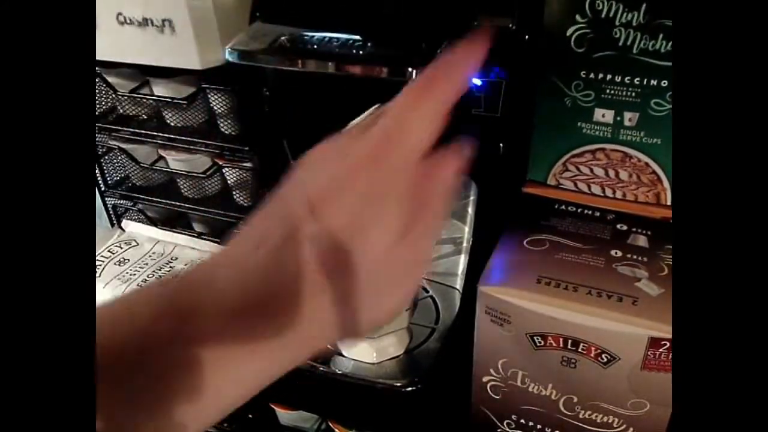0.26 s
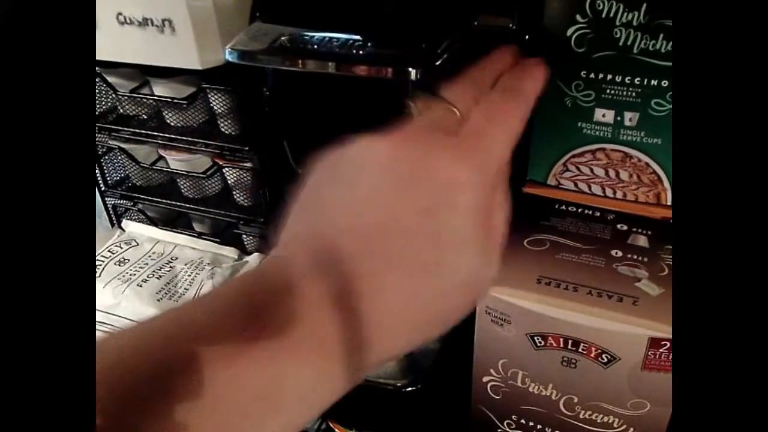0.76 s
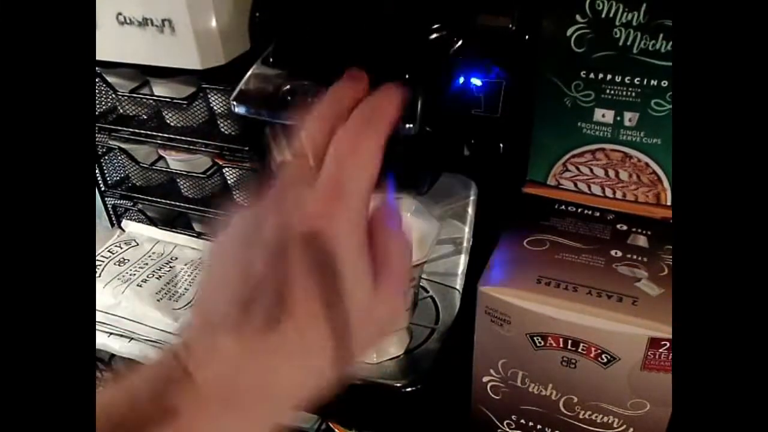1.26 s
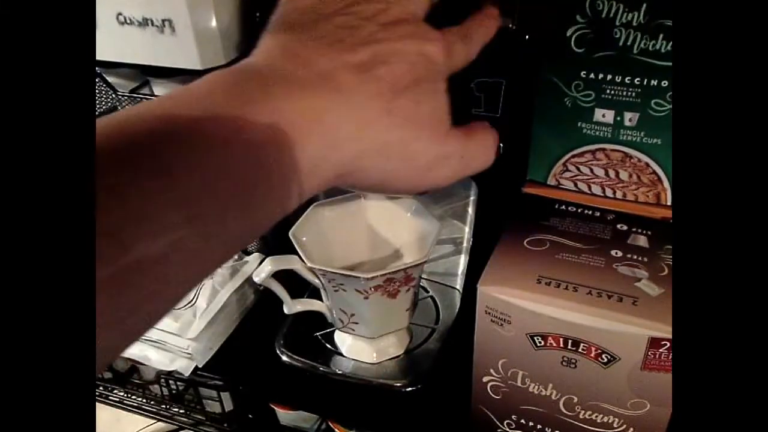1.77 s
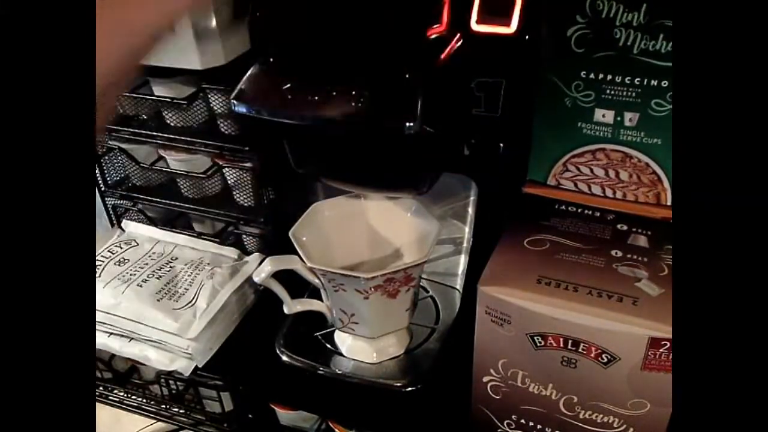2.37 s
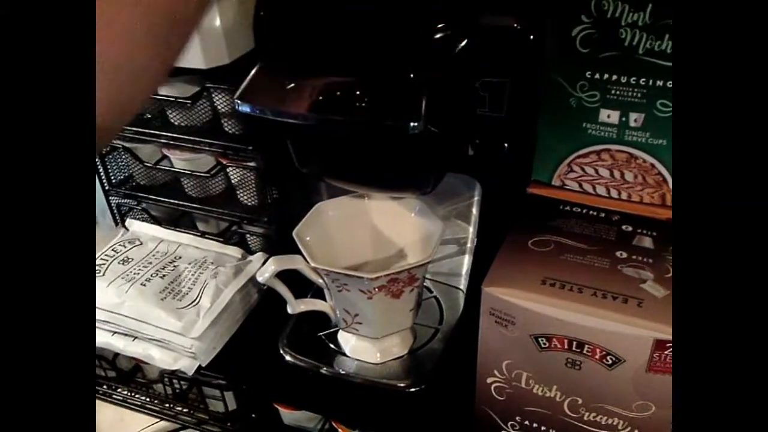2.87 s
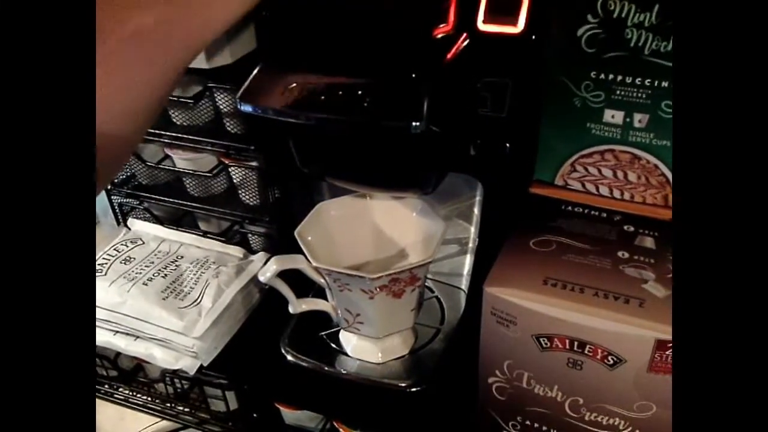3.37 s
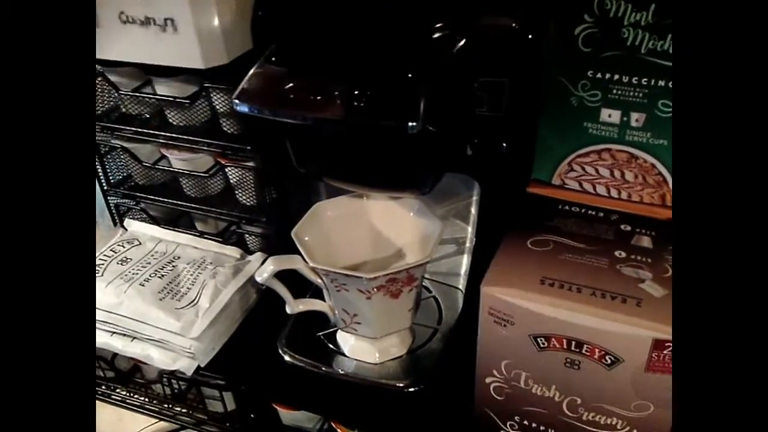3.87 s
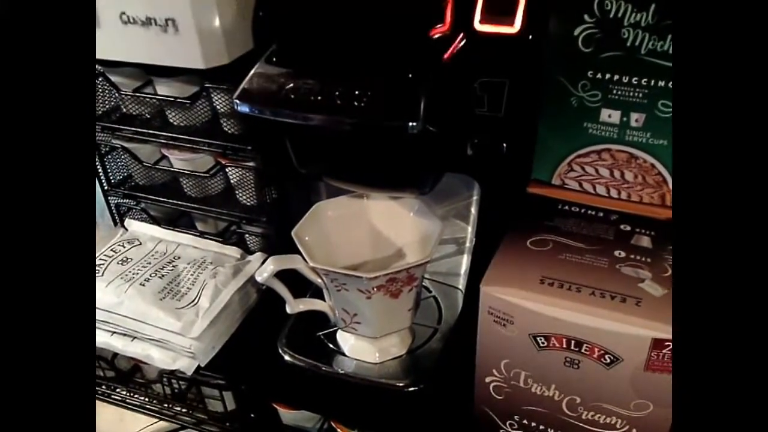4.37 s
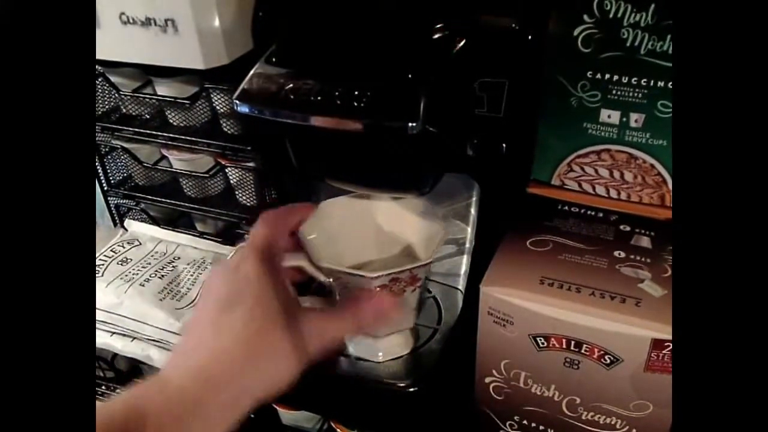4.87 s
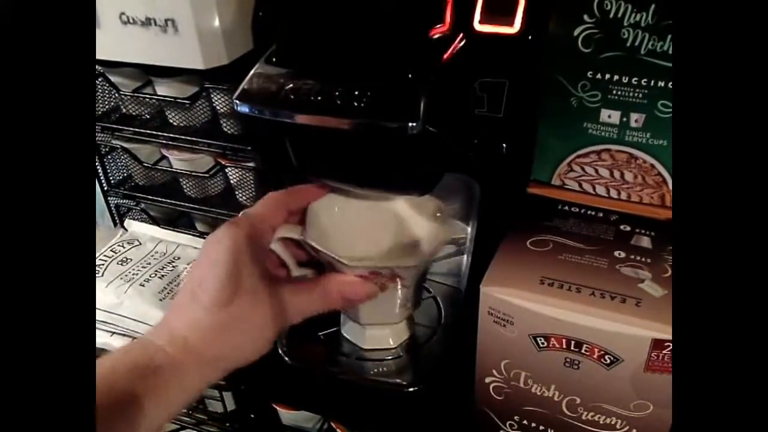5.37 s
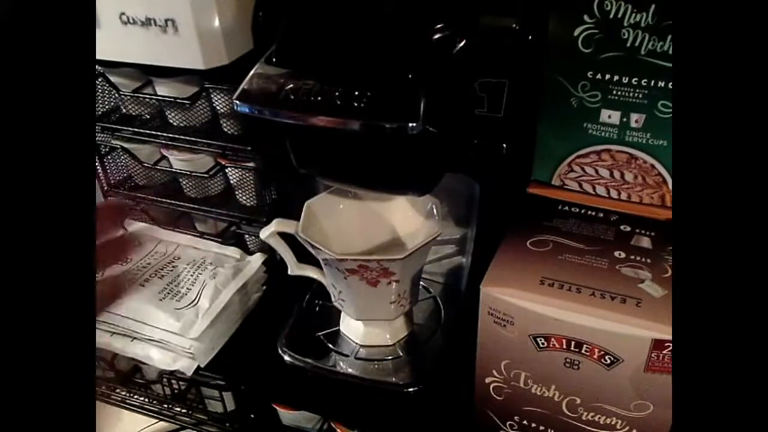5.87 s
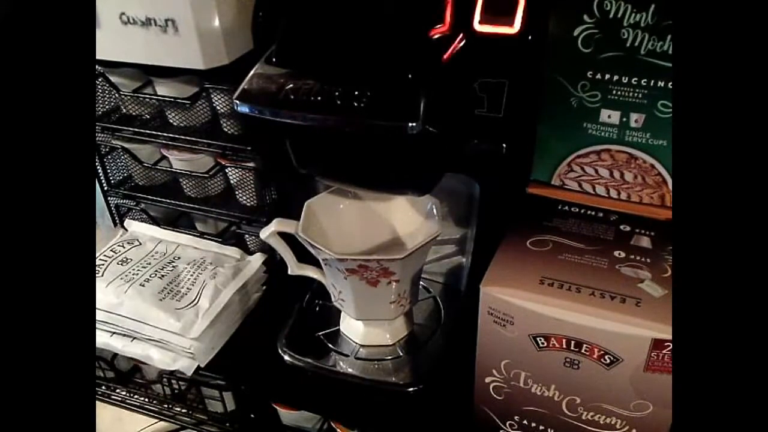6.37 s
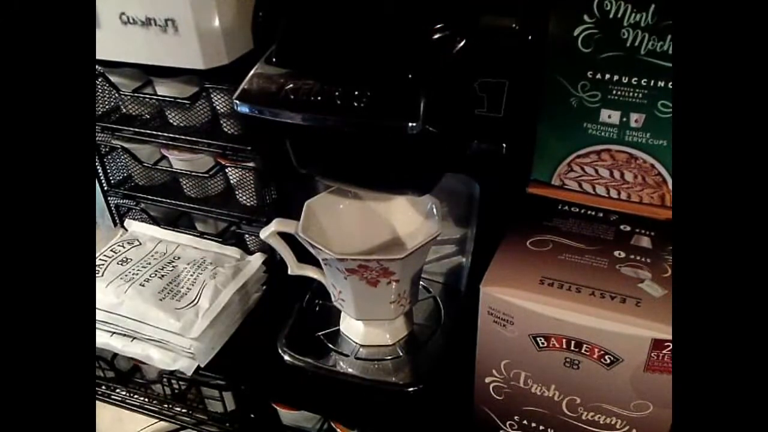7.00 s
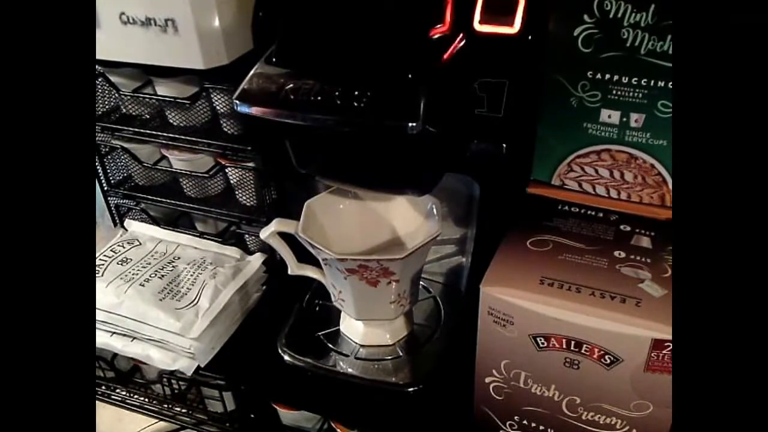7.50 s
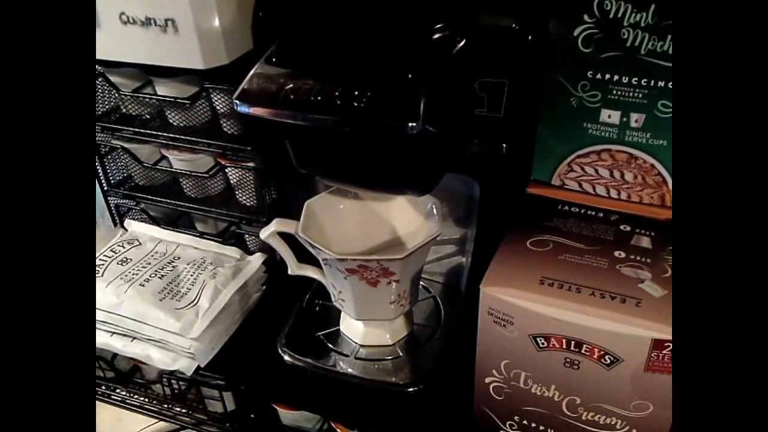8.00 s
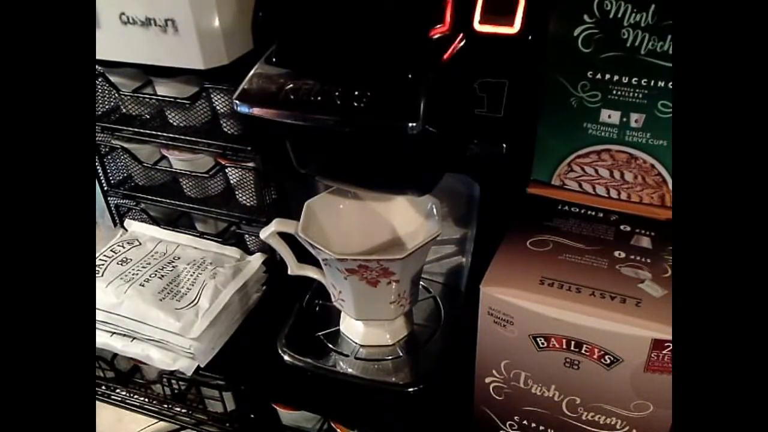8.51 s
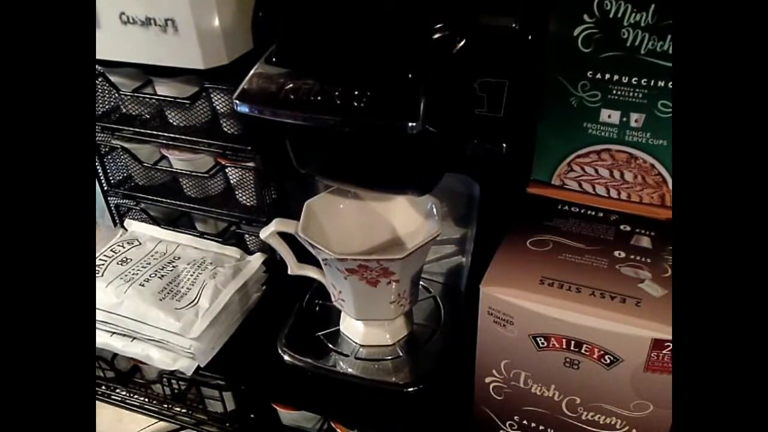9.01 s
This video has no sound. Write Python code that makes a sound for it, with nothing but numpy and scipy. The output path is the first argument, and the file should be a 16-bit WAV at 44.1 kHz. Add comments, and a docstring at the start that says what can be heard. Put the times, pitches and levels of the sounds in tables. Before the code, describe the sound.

In a quiet kitchen, a coffee machine is snapped shut with sharp clicks, a cup shifts on its tray, and heating water begins faintly.

```python
"""A coffee brewer on a kitchen counter, close to a phone: a hand shuts its pod drawer, presses buttons, works and slams
the lid, then shifts a china cup on the drip tray. Something thuds on the counter and the boiler starts a faint rush.
Blows excite decaying modes and noisy clatter; rubbing and dragging are shaped noise; panel flexing and a hinge
squeak are sines; the boiler is noise through resonances. A quiet room tone and low rumble, both coloured noise,
lie under it all."""
import sys
import numpy as np
from scipy import signal
from scipy.fft import rfft, irfft
from scipy.io import wavfile
from scipy.ndimage import uniform_filter1d

SR = 44100
rng = np.random.default_rng(int(sys.argv[2]) if len(sys.argv) > 2 else 0)


def unload_audio(sound):
    """Save the sound as a 16-bit wav file, at the path given as the first command line argument."""
    columns = np.transpose(np.atleast_2d(sound))
    # keep every value between -1 and 1, then stretch to whole-number steps
    steps = np.round(np.clip(columns, -1, 1) * 32767)
    wavfile.write(sys.argv[1], SR, steps.astype(np.int16))


N = 407925
TIME = np.arange(N) / SR

# Room tone spectrum: (frequency [Hz], relative level per Hz [dB])
ROOM_SPECTRUM = [(53, -21.5), (90, -1), (183, -9), (250, -10.5), (382, -3), (520, -11.5), (700, -7),
                 (1000, -11.5), (1350, -14), (1800, -22), (2600, -19), (3840, -25.5), (11500, -31.5),
                 (15600, -35)]
# Low rumble spectrum: (frequency [Hz], relative level per Hz [dB])
RUMBLE_SPECTRUM = [(2.4, -34), (4.0, 3), (22, -1), (29, -5), (54, -11.5), (131, -29), (156, -24.5),
                   (184, -30), (200, -26.5), (260, -66), (440, -120)]
# Mean rumble level, about which it wanders: (time [s], level [dB])
RUMBLE_LEVEL = [(0, -56), (1.4, -52.5), (2.5, -59.5), (2.95, -55.5), (3.7, -49.5), (4.3, -55.5),
                (6.3, -55.5), (9.25, -56)]
# Strokes of a hand over plastic: (peak time [s], rise [s], fall [s], level [dB],
#     low share [dB], bright share [dB])
RUB_STROKES = [(.52, 0.24, 0.05, -67, -9, -14), (1.08, 0.12, 0.9, -72.5, 10, -26),
               (2.2, 0.16, 0.2, -61, -27, -26), (2.9, 0.068, 0.13, -66, 11.5, -5.5),
               (3.12, 0.21, 0.083, -70, 11, -12), (3.35, 0.1, 0.12, -71, 13.5, 1),
               (3.6, 0.23, 0.32, -64.5, -0.5, -8), (4.11, 0.074, .1, -69.5, -13.5, -1.5),
               (4.87, .13, 0.087, -63, -21, -2), (5.23, 0.036, 0.046, -56.5, -3, -3.5),
               (5.47, .12, 0.33, -65, 0.5, -11), (7.76, 0.16, 0.3, -62.5, -8, -10)]
# Rubbing felt through the counter: (frequency [Hz], relative level per Hz [dB])
RUB_LOW_SPECTRUM = [(30, -34), (70, 7.5), (130, -4.5), (250, -7), (500, -27), (16000, -120)]
# Loose plastic after a blow, before tilting: (frequency [Hz], relative level per Hz [dB])
CLATTER_SPECTRUM = [(35, -58.5), (70, -27), (226, -20), (480, -2.5), (700, -7.5), (1000, -4), (1300, -11.5),
                    (1650, -20.5), (2100, -20.5), (2700, -19), (3500, -29), (5000, -36), (10000, -53.5),
                    (13000, -57), (16000, -75)]

# Blows on each part; the struck spot favours the modes near one pitch. All six tables:
#     (time [s], nominal level [dB], spectral tilt [dB/octave], favoured frequency [Hz],
#     clatter relative to ring [dB], contact time constant [s])
DRAWER_BLOWS = [(.994, -44, 0, 650, -9, 0.0046), (1.034, -43.5, -1.5, 1100, -6, .0015),
                (1.074, -46, 5, 1150, 2, .007), (1.091, -32.5, 3, 4000, 5.5, 0.0029),
                (1.095, -22, -0.5, 800, -5.5, 0.0029), (1.32, -50.5, -6, 700, -9, 0.00088),
                (1.498, -57, -3, 750, -8, 0.00098)]
BUTTON_BLOWS = [(1.829, -35.5, 0.5, 1140, -16.5, 0.0012), (1.843, -43, -11, 1200, -17, 0.0014),
                (1.958, -34, 0.5, 1260, -10, 0.0018), (2.156, -56, 6.5, 4700, -5, 0.0011),
                (2.176, -52, 0, 2820, 6.5, 0.002)]
LID_BLOWS = [(2.924, -49.5, -0.5, 2800, -22, .0015), (3.048, -54, 7, 2450, -7, .002),
             (3.055, -40.5, -.5, 1050, -13, 0.00089), (3.092, -49.5, 2, 2700, 0, 0.0018),
             (3.295, -46, 0, 1190, -1.5, 0.0017), (3.312, -42.5, -1.5, 2500, 0, .0021),
             (3.379, -50.5, 0, 1000, -3, 0.0032), (3.493, -39, -1, 880, -3, 0.0016),
             (3.512, -48, -3.5, 810, 10, 0.0032), (3.701, -42, -2.5, 750, -13, 0.0031),
             (3.729, -33.5, 3, 599, 6, 0.00082), (3.7323, -14.5, 1.5, 510, -7.5, .0004),
             (3.734, -18.5, 2.5, 996, -1.5, .0004)]
CUP_BLOWS = [(4.788, -38, 1.5, 7800, -36, 0.00098), (4.851, -67, -5, 4400, 4, .0005),
             (4.904, -57.5, -8, 12500, 8, .0005), (4.999, -50, -4.5, 6450, -14, .0003),
             (5.203, -65, 6, 10500, 7, .001), (5.227, -57, -1, 5950, -6, .001),
             (5.651, -62, -6, 4430, -12, 0.0013), (5.653, -64.5, 0, 6100, -14, .001)]
TRAY_BLOWS = [(4.791, -45, -1, 600, 3, 0.0021), (4.848, -46, 5, 1100, -14, .0032),
              (4.884, -51, 3.5, 2700, -1, .0033), (4.92, -41, 1, 696, 3.5, 0.0058),
              (4.998, -48, 3.5, 1010, -8, 0.0017), (5.183, -44.5, -0.5, 714, -4, .001),
              (5.204, -39.5, 4, 800, -10, 0.0058), (5.228, -54, 6, 2500, 4, .002),
              (5.256, -41, 0.5, 790, 1, 0.0024), (5.391, -32, 3, 950, -14, 0.0029),
              (5.417, -35.5, -8, 456, -.5, .0037), (5.468, -47.5, 1.5, 995, 4, 0.0064)]
COUNTER_BLOWS = [(7.554, -19, 1, 857, -7.5, 0.0032), (7.888, -41.5, -5.5, 610, -1, 0.0023),
                 (8.541, -51.5, 5, 1600, -2.5, 0.001)]

# Modes each part rings with; blows() scales the decay. All six tables:
#     (frequency [Hz], relative level [dB], unscaled 60 dB decay time [s])
DRAWER_MODES = [(72.7, -7, 0.39), (151, 1.5, 0.2), (264, 0.5, 0.14), (380, -3, 0.19), (534, -18, 0.11),
                (674, 6.5, 0.12), (765, 0.5, .15), (1059, 4, 0.11), (1227, 1, 0.15), (1470, -12, 0.15),
                (1956, 3, 0.1), (2630, 16, 0.043), (2740, -9, 0.052), (3410, 3, .05), (4400, -3, .05)]
BUTTON_MODES = [(790, -8, 0.075), (1030, 4, 0.021), (1193, -4, 0.071), (1305, -10, 0.043),
                (1625, -11.5, 0.061), (1920, -20, 0.033), (2090, -8, 0.058), (2320, -9, 0.057),
                (2630, -11, 0.068), (2850, -14.5, 0.067), (3660, -27, .035), (4670, -14.5, 0.038),
                (5220, -17, 0.021)]
LID_MODES = [(143, -12.5, 0.12), (274.2, -14, 0.43), (391, -7.5, 0.203), (431, -7.5, 0.21),
             (455.7, -4, 0.14), (513, -1.5, 0.11), (587, -16, 0.1), (685, -11.5, 0.085), (787.6, -8, 0.14),
             (882.6, -14.5, 0.199), (937, -7.5, 0.082), (967, -2, 0.11), (1077, -2, 0.082),
             (1198, -4.5, .1), (1254, -15, 0.16), (1430, -40.5, 0.093), (1500, -19.5, .06),
             (1948, -19, 0.05), (2078, 0.5, 0.033), (2352, -1.5, .06), (2480, -8.5, 0.046),
             (2640, -15, 0.066), (3000, -16, 0.046), (3340, -25.5, 0.055), (3680, -25, .06),
             (4520, -29.5, .07), (561, -2, 0.0317), (1050, 2, 0.02), (2152, 7.5, 0.0087), (4150, -5, 0.013)]  # the last four: the stiff snap of the latch
CUP_MODES = [(3110, -1, 0.083), (4430, -6, 0.094), (5050, -16, .04), (6110, -6, 0.057), (6620, -16, 0.073),
             (6860, 1.5, 0.053), (7850, -9, 0.049), (10040, -13, 0.047), (10130, 4, 0.036),
             (11180, -2, 0.039), (11700, -9, 0.042), (12260, -10, .036), (13000, -16, .03),
             (14000, -18, .025)]
TRAY_MODES = [(291, -5.5, 0.1), (466, -21, 0.1), (540, 5, 0.046), (757, -16, 0.21), (1066, 1, 0.065),
              (1274, -9, 0.099), (2360, -20.5, 0.1), (2800, -20.5, 0.084), (3220, -23, 0.11)]
COUNTER_MODES = [(319, -6.5, 0.25), (389, 7, 0.13), (486, 3, 0.025), (582, -6, 0.22), (730, 4.5, 0.046),
                 (881, -15.5, 0.032), (994, 10.5, 0.037), (1112, -0.5, 0.21), (1280, -6.5, 0.15),
                 (1510, -26, 0.08), (1990, -8, 0.053), (2290, -13, 0.047), (2930, -20, .04)]

# Soft weight flexing a panel for a few cycles: (start [s], length [s], frequency [Hz], level [dB])
FLEXES = [(1.1, 0.059, 130, -40), (2.898, 0.043, 254, -50), (3.305, 0.028, 242, -48),
          (7.5548, 0.023, 138, -23.5), (7.577, 0.036, 137, -42), (7.628, 0.09, 135, -51),
          (7.738, 0.069, 145.4, -47.5), (7.888, 0.03, 141, -36)]
# Thin hinge squeak, one row: (start [s], end [s], frequency [Hz], level [dB])
HINGE_SQUEAK = (2.99, 3.042, 7760, -74)
# Strokes of the cup's foot over the tray: (peak time [s], rise [s], fall [s], level [dB])
DRAG_STROKES = [(4.92, .12, .025, -67), (5.225, 0.035, 0.023, -57), (5.4, 0.011, 0.061, -63)]
# Boiler resonances: (frequency [Hz], width [Hz], relative level [dB])
BOILER_PEAKS = [(409, 52, -3), (492, 45, -2.5), (680.5, 24, 3), (853, 120, -5.5), (1018, 66, -6),
                (1092, 23, 0), (1500, 370, -24), (2230, 93, -17)]

# Response to a middling blow: (ring length factor, clatter 60 dB decay [s], clatter tilt [dB/octave])
DRAWER_MAKE, BUTTON_MAKE, LID_MAKE = (0.65, .085, 0.63), (0.83, 0.08, 1.1), (0.5, .065, 0.43)
CUP_MAKE, TRAY_MAKE, COUNTER_MAKE = (1.28, .04, 4.2), (0.94, 0.052, 0.57), (0.52, 0.069, -5.5)
MIDDLING_DB = -40
RING_GAIN, CLATTER_GAIN = 0.23, 0.12  # dB of decay length gained for each dB of blow
LOOSE_LOSS = 0.46  # dB of clatter length lost for each dB of clatter share
EDGE_DB = 15  # a stroke is this far down after its rise or fall time
BOILER_ON_S, BOILER_DB, BOILER_RISE_DB_S = 7.78, -69, 6.5  # onset, level at onset, growth per second
ROOM_DB = -64.5
TOP_HZ = 15650


def undb(db):
    """Logarithmic levels: decibels become an amplitude ratio."""
    return 10 ** (np.asarray(db) / 20)


def unit(x):
    """Power normalisation: the signal is scaled to rms 1."""
    return x / np.sqrt(np.mean(x ** 2))


def coloured(x, spectrum, tilt_db=0.):
    """Spectral shaping: x takes a colour interpolated in log frequency, tilted about 1 kHz, at rms 1."""
    table_hz, table_db = np.transpose(spectrum)
    bin_hz = np.arange(len(x) // 2 + 1) * SR / len(x)
    octave = np.log2(np.maximum(bin_hz, 1))
    colour_db = np.interp(octave, np.log2(table_hz), table_db)
    gain_db = colour_db + tilt_db * (octave - np.log2(1000))
    return unit(irfft(rfft(x) * undb(gain_db), len(x)))


def walk(rate):
    """Slow random modulation: levels held 1 / rate s are smoothed twice, with spread near 1."""
    hold = int(SR / rate)
    steps = np.repeat(rng.standard_normal(N // hold + 1), hold)
    smooth = uniform_filter1d(uniform_filter1d(steps, hold), hold)
    return unit(smooth)[:N]


def curve(table, column):
    """Linear interpolation: one column of a table becomes a line over time."""
    rows = np.transpose(table)
    return np.interp(TIME, rows[0], rows[column])


def stroke(peak_s, rise_s, fall_s, db):
    """Exponential envelope: the gain swells to a peak and sinks again."""
    before, after = (peak_s - TIME) / rise_s, (TIME - peak_s) / fall_s
    return undb(db - EDGE_DB * np.where(TIME < peak_s, before, after))


def blows(events, modes, make):
    """Modal impact: contact starts decaying modes, cracks, and shakes loose parts into short clatter."""
    out, t = np.zeros(N + SR), np.arange(10240) / SR
    hz, mode_db, t60 = np.transpose(modes)[:, :, None]
    ring_factor, clatter_t60, clatter_tilt_db = make
    for start_s, level_db, tilt_db, spot_hz, clatter_db, contact_s in events:
        near_spot = np.exp(-(np.log2(hz / spot_hz) / .25) ** 2)
        spot_db = 8.5 * near_spot + 2.54 * rng.standard_normal(hz.shape)
        gain = undb(mode_db + spot_db + tilt_db * np.log2(hz))
        # every mode is a close pair that beats, so the ring sounds rough
        twin_hz = hz * (1 + .012 * rng.standard_normal(hz.shape))
        pair = np.sin(2 * np.pi * hz * t) + 0.63 * np.sin(2 * np.pi * twin_hz * t)
        # harder blows ring and clatter longer
        force_db = level_db - MIDDLING_DB
        ring_t60 = t60 * ring_factor * undb(RING_GAIN * force_db)
        decay = undb(-60 * t / ring_t60)
        body = np.sum(gain * decay * pair, axis=0) / np.sqrt(np.sum(gain ** 2))

        noise = rng.standard_normal(len(t))
        # the more of a blow is clatter, the sooner it dies
        loose_t60 = clatter_t60 * undb(CLATTER_GAIN * force_db - LOOSE_LOSS * clatter_db)
        fade_db = -60 * t / loose_t60
        noise_tilt_db = tilt_db + clatter_tilt_db
        clatter = coloured(noise, CLATTER_SPECTRUM, noise_tilt_db) * undb(fade_db)
        # the first contact is brighter and much shorter than the clatter
        crack = coloured(noise, CLATTER_SPECTRUM, noise_tilt_db + 5.0) * undb(13.0 * fade_db + 1.0)
        onset = 1 - np.exp(-t / contact_s)
        blow = undb(level_db) * onset * (body + undb(clatter_db) * (clatter + crack))
        start = int(start_s * SR)
        out[start:start + len(t)] += blow
    return out[:N]


def room():
    """Stationary background noise: a smooth tone drifts a little over a low wandering rumble."""
    tone = coloured(rng.standard_normal(N), ROOM_SPECTRUM) * undb(ROOM_DB + 0.4 * walk(5))
    rumble_db = curve(RUMBLE_LEVEL, 1) + 0.98 * walk(3)
    rumble = coloured(rng.standard_normal(N), RUMBLE_SPECTRUM) * undb(rumble_db)
    return tone + rumble


def rubbing():
    """Friction noise: uneven slips excite the plastic, with a low and a bright share."""
    slips = rng.standard_normal(N) * undb(2.7 * walk(70))
    low = coloured(slips, RUB_LOW_SPECTRUM)
    mid = coloured(slips, CLATTER_SPECTRUM, -7.0)
    bright = coloured(slips, CLATTER_SPECTRUM, 8.2)
    out = np.zeros(N)
    for peak_s, rise_s, fall_s, db, low_db, bright_db in RUB_STROKES:
        blend = mid + low * undb(low_db) + bright * undb(bright_db)
        out += stroke(peak_s, rise_s, fall_s, db) * blend
    return out


def drawer():
    """Modal impact: the shutting pod drawer rings and clatters."""
    return blows(DRAWER_BLOWS, DRAWER_MODES, DRAWER_MAKE)


def flexing():
    """Forced bending: low swings swell and die with the push."""
    out = np.zeros(N)
    for start_s, length_s, hz, db in FLEXES:
        t = np.arange(int(length_s * SR)) / SR
        swell = np.sin(np.pi * (t / length_s) ** 1.14)
        start = int(start_s * SR)
        out[start:start + len(t)] += undb(db) * swell * np.sin(2 * np.pi * hz * t)
    return out


def buttons():
    """Modal impact: the pressed buttons click in short modes."""
    return blows(BUTTON_BLOWS, BUTTON_MODES, BUTTON_MAKE)


def lid():
    """Modal impact: the lid rings as it is worked and slammed, with the stiff snap of its latch."""
    return blows(LID_BLOWS, LID_MODES, LID_MAKE)


def squeak():
    """Frequency modulation: the hinge gives a short whistle of wavering pitch."""
    start, end, hz, db = HINGE_SQUEAK
    gate = np.interp(TIME, [start, start + .006, end - .006, end], [0, 1, 1, 0])
    cycles = np.cumsum(hz * (1 + .003 * walk(58.4))) / SR
    return undb(db) * gate * np.sin(2 * np.pi * cycles)


def cup():
    """Modal impact: the china cup rings in high, short modes."""
    return blows(CUP_BLOWS, CUP_MODES, CUP_MAKE)


def tray():
    """Modal impact: the drip tray rings and clatters under the cup."""
    return blows(TRAY_BLOWS, TRAY_MODES, TRAY_MAKE)


def dragging():
    """Stick-slip friction: the foot catches and slips in small uneven ticks that ring the damped china."""
    ticks = (rng.random(N) < 300 / SR) * undb(14 * rng.random(N))  # 300 per second on average
    tick_decay = np.exp(-1 / (0.0019 * SR))
    grit = rng.standard_normal(N) * signal.lfilter([1], [1, -tick_decay], ticks)
    china = np.zeros(N)
    for hz, db, _ in CUP_MODES:
        b, a = signal.iirpeak(hz, 30., SR)
        china += undb(db) * signal.lfilter(b, a, grit)
    sound = coloured(grit, CLATTER_SPECTRUM, 4.5) + undb(-9.0) * unit(china)
    return sound * sum(stroke(*row) for row in DRAG_STROKES)


def counter():
    """Modal impact: thuds set the counter ringing."""
    return blows(COUNTER_BLOWS, COUNTER_MODES, COUNTER_MAKE)


def boiler():
    """Resonance: warming water rushes in the tank's peaks, each flickering alone, growing steadily."""
    rush = np.zeros(N)
    for hz, width_hz, db in BOILER_PEAKS:
        b, a = signal.iirpeak(hz, hz / width_hz, SR)
        rush += undb(db + 2.4 * walk(12)) * signal.lfilter(b, a, rng.standard_normal(N))
    since = TIME - BOILER_ON_S
    onset = np.clip(since / 0.033, 0, 1)
    return unit(rush) * undb(BOILER_DB + BOILER_RISE_DB_S * since) * onset


def scene():
    """Superposition: all sources add as they reach the phone."""
    brewer = drawer() + buttons() + lid() + squeak() + boiler()
    china_and_tray = cup() + tray() + dragging()
    worktop = counter() + flexing()
    return (room() + rubbing() + brewer + china_and_tray + worktop)[None]


def record(dry):
    """Low-pass filtering: the phone cuts the top with a steep elliptic slope."""
    return signal.sosfilt(signal.ellip(10, .2, 70, TOP_HZ, fs=SR, output="sos"), dry)


dry = scene()
out = record(dry)
unload_audio(out)
```